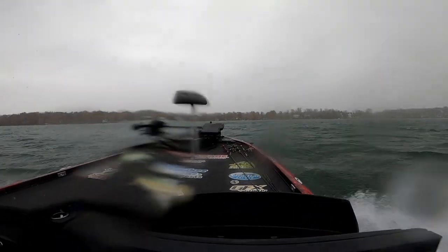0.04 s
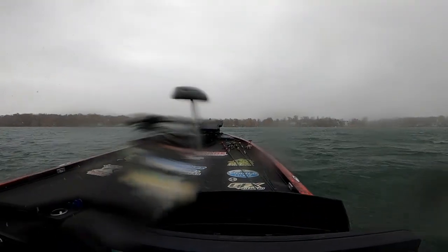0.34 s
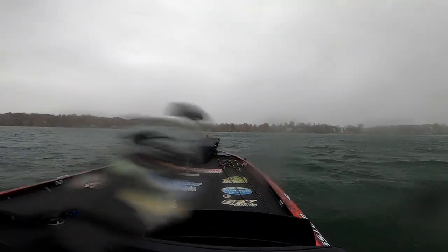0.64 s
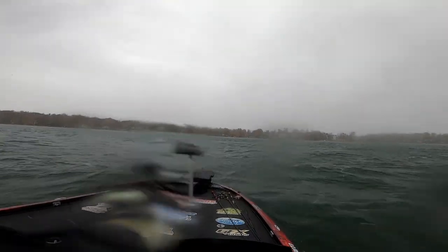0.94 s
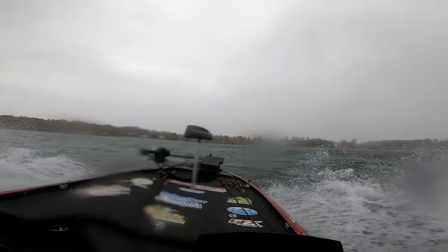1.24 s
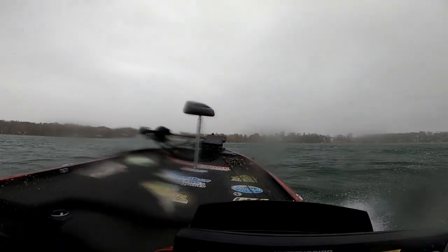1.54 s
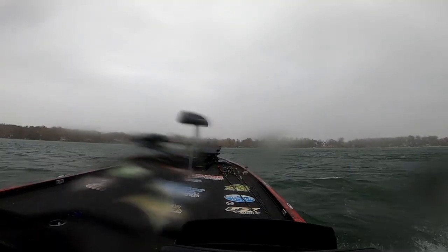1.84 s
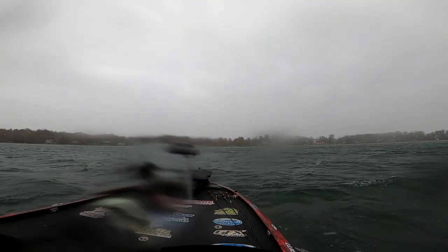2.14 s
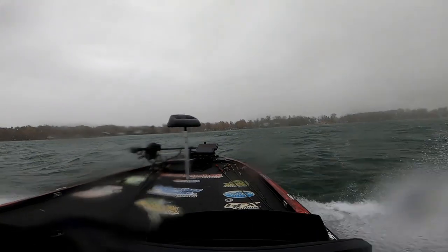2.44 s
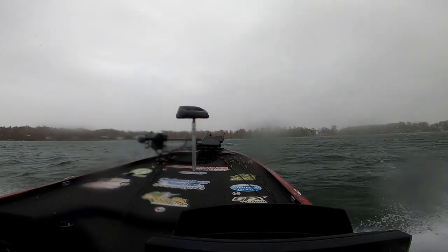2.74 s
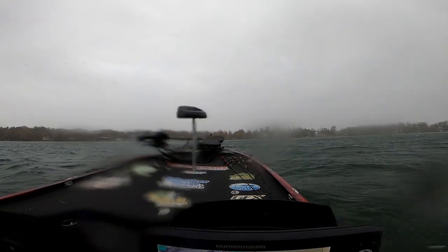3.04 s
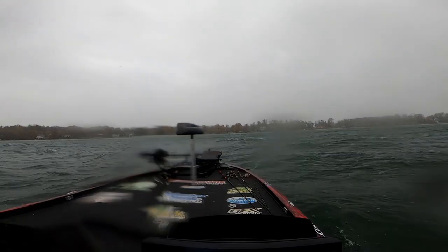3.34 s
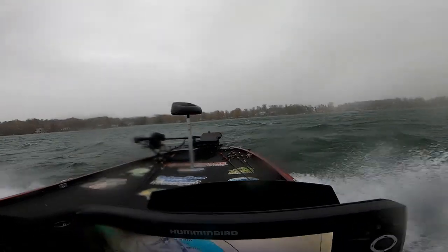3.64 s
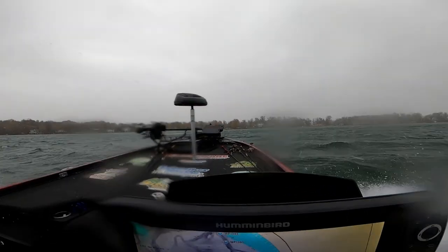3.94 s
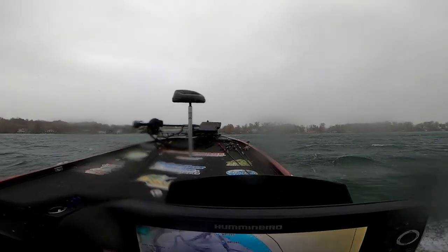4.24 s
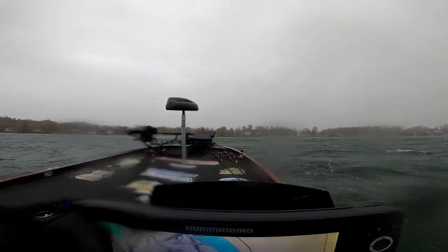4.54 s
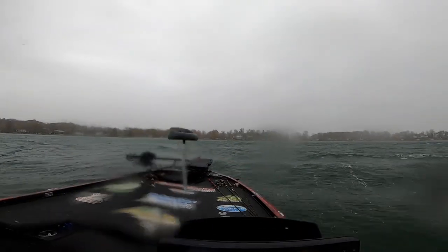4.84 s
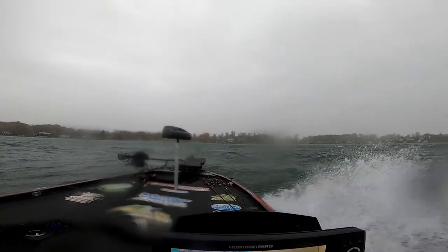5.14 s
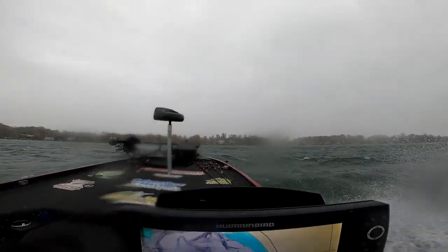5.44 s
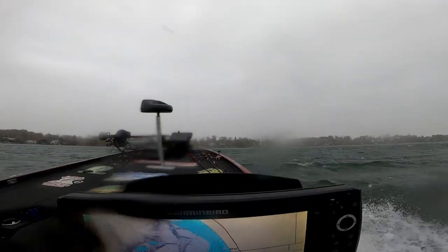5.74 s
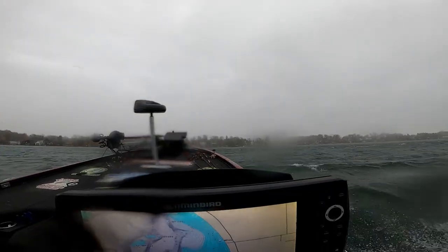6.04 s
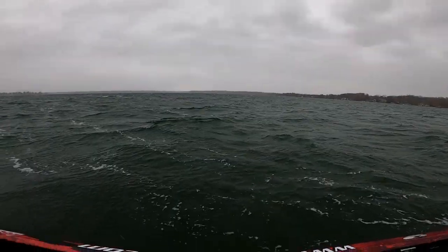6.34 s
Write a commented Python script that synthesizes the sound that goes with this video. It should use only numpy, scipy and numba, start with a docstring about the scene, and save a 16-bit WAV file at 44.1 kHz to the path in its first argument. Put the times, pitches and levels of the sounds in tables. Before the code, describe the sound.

Gusty wind buffets the microphone as a motorboat slaps and thumps through choppy waves, with rushing spray over a droning outboard engine.

```python
"""A gust buffets the microphone and water crackles on the hull: an outboard boat in chop on a windy lake.
From a stereo microphone at the console, each wave brings a gust, a wash and sheets of spray, a little
to the right. Water slaps the hull and keeps it droning; air trapped beneath it gulps and thumps.
The engine's tones sink as it eases off. A limiter holds the peaks; near the end the sound cuts off."""
import sys
import numpy as np
from scipy import signal
from scipy.fft import rfft, irfft
from scipy.io import wavfile
from scipy.ndimage import uniform_filter1d, minimum_filter1d
from numba import njit

SR = 44100
rng = np.random.default_rng(int(sys.argv[2]) if len(sys.argv) > 2 else 0)


def generate_wav(sig):
    """Save sig (samples, or channels by samples) to the path in sys.argv[1] as 16-bit PCM at SR."""
    pcm = np.round(np.clip(np.atleast_2d(sig).T, -1, 1) * 32767).astype(np.int16)
    wavfile.write(sys.argv[1], SR, pcm)


N = 281358
T = np.arange(N) / SR
CUT_S = 6.254

# spectra of wind on the microphone, wash, thrown sheets, mist and slaps: f/Hz, relative level/dB
WIND_SPECTRUM = [(10, -7.5), (22, -4.5), (42, -2), (70, -0.5), (110, -4), (160, -5.5), (230, -9.5),
                 (400, -15.5), (1000, -36), (3000, -99.5)]
WASH_SPECTRUM = [(100, -20.5), (190, -24.5), (280, 7.5), (370, 5.5), (460, 0.5), (680, -1), (1000, -5.5),
                 (1500, -14), (3000, -33.5), (7000, -79.5)]
SHEET_SPECTRUM = [(150, -45.5), (400, -12.5), (900, 3.5), (1400, 2.5), (1950, 1), (2350, 0), (2700, -2),
                  (2950, -5), (4200, -7.5), (6500, -16), (9000, -68)]
MIST_SPECTRUM = [(200, -40), (800, -2.5), (2000, -5.5), (3000, 1), (4000, 2), (5000, -2.5), (6200, -4.5),
                 (7000, -8), (8000, -17.5), (9500, -30), (11000, -49)]
SLAP_SPECTRUM = [(60, -7.5), (200, 4), (600, 23), (1200, 11), (2400, 2.5), (4000, -2), (6000, -13),
                 (9000, -49)]
# hull resonances: f/Hz, width/Hz, relative level/dB
HULL_MODES = [(192, 66, -1), (278, 89.5, 0), (319.6, 57, -2.5), (491, 27, -14), (678, 50, -18)]
# the hull's drone underfoot: t/s, level/dB
DRONE_LEVEL = [(0, -26), (.45, -32), (.85, -24), (1.25, -25.5), (1.74, -28.5), (2.0, -27), (2.45, -23),
               (2.8, -19), (3.12, -25.5), (3.7, -23.5), (4.0, -21), (4.3, -19.5), (4.6, -20.5),
               (4.72, -29.5), (5.0, -26.5), (5.1, -20.5), (5.45, -21.5), (6.24, -24.5)]
# the outboard, heard from the console: t/s, firing rate/Hz, level before trim/dB
ENGINE_RUN = [(0, 380, -36), (.35, 376.6, -37), (.5, 361.5, -23.5), (.7, 350.2, -27), (.92, 365.6, -27),
              (1.13, 369.6, -25), (1.2, 352.5, -33.5), (1.8, 280, -39.5), (2.3, 249, -41.5),
              (3.33, 235, -37), (3.4, 232, -21.5), (3.49, 232, -27), (3.55, 233, -21.5), (3.63, 238, -35),
              (3.74, 242.5, -23), (3.99, 256.7, -20.5), (4.13, 253.5, -31), (4.58, 233.8, -44),
              (4.67, 228.5, -18.5), (4.88, 227, -18.5), (5.09, 223.6, -18.5), (5.24, 241, -36),
              (5.38, 262.8, -22.5), (5.55, 261, -23), (5.8, 244.8, -31.5), (6.24, 223, -40.5)]
# engine tones: multiple of the crank rate, relative level/dB
# 6 is the firing; multiples of 1.714 are overtones of the propeller blades
ENGINE_ORDERS = [(1, -12), (3, -16), (4.29, -11.5), (5, -18), (5.14, -18), (6, 0), (7, -27), (8, -21),
                 (8.57, -21), (10.29, -21), (12, -25)]
# the bow ploughs into a wave: t/s, length/s, then levels before trim: gust/dB, wash/dB, sheets/dB
BOW_WAVES = [(0, 0.17, -12.5, -24.5, -36), (0.088, 0.27, -22.5, -28, -37.5),
             (0.857, 0.37, -22.5, -29.5, -53.5), (1.171, 0.28, -17, -26, -36), (1.453, 0.2, -19, -29, -56),
             (1.824, 0.12, -24, -40, -54), (2.165, 0.23, -27, -35.5, -34),
             (2.41, 0.16, -28.5, -34.5, -32.5), (2.615, 0.17, -22, -44, -33.5),
             (2.86, 0.23, -22, -34.5, -37), (3.584, 0.17, -23, -24.5, -38.5), (3.8, 0.063, -33, -26.5, -31),
             (4.06, 0.16, -17.5, -36.5, -36.5), (4.305, 0.14, -20, -40, -42.5),
             (4.99, 0.088, -28, -29.5, -37), (5.177, 0.12, -17, -32.5, -35), (5.6, 0.12, -19, -30, -52),
             (5.849, 0.25, -18, -27.5, -60)]
# brief dips in the rush of wind and water: t/s, depth/dB, length/s
RUSH_DIPS = [(0.147, 4, 0.032), (0.315, 5, 0.033), (1.446, 7.5, 0.028), (1.682, 1, 0.13), (2.231, 2, 0.052),
             (2.55, 1.5, 0.035), (4.385, 7, 0.016), (4.652, 0, 0.36), (5.07, 5, 0.032)]
# hiss of mist: t/s, level before trim/dB
MIST_LEVEL = [(0, -39), (.32, -65), (.5, -45.5), (1.1, -49.5), (1.35, -54), (1.5, -58.5), (1.85, -48.5),
              (2.15, -40), (2.7, -43), (2.92, -45), (3.3, -39.5), (3.65, -39), (3.98, -46.5), (4.55, -38.5),
              (4.66, -41.5), (4.97, -42), (5.17, -40), (5.47, -45), (5.85, -41.5), (6.24, -39.5)]
# droplets on the microphone housing: t/s, level before filtering/dB
DROPLET_HITS = [(1.187, -16), (4.384, -13)]
# slabs of thrown water landing close by: t/s, length/s, centre f/Hz, width/Hz, level/dB
SLAB_LANDINGS = [(1.276, 0.022, 2270, 450, -32.5), (1.318, 0.043, 2000, 1200, -35),
                 (2.2, 0.38, 2380, 520, -41), (2.25, 0.22, 1140, 800, -36.5),
                 (2.543, 0.01, 1900, 1200, -23.5), (2.58, 0.3, 2400, 520, -41),
                 (3.776, 0.071, 2120, 1100, -34.5), (4.06, .11, 2410, 600, -38.5),
                 (5.211, 0.066, 1750, 1097, -31.5), (5.26, 0.095, 746, 200, -30),
                 (5.613, 0.032, 1700, 1100, -32)]
# air pockets trapped under the hull: t/s, f/Hz, level before the envelope/dB, decay/s
AIR_POCKETS = [(0.099, 110, -14, 0.036), (.265, 108.4, -5, 0.036), (1.229, 201, -5.5, 0.038),
               (1.35, 99, -11.5, 0.042), (2.09, 252, -14, .035), (2.16, 224.6, -9.5, 0.031),
               (2.21, 91, -5.5, 0.021), (2.461, 132.5, -4, 0.032), (2.47, 187, -6.5, 0.029),
               (2.625, 246, -12, 0.03), (2.715, 55, -14, .035), (2.72, 210, -14, 0.032),
               (2.79, 160, -9.5, 0.029), (2.921, 115, -11.5, 0.039), (3.366, 235, -16, 0.057),
               (3.53, 272.7, -10.5, 0.047), (3.66, 204, -11, 0.048), (3.664, 160, -6, 0.022),
               (3.73, 70.5, -7.5, 0.029), (3.92, 165, -6.5, 0.039), (3.986, 224.7, -7, 0.069),
               (4.1, 287, -13, .05), (5.409, 152.3, -9, 0.083), (5.879, 127, -10.5, 0.051)]
# air cavities squeezed shut under the hull: t/s, length/s, first f/Hz, last f/Hz, level/dB
CAVITIES = [(1.426, .0105, 418, 1146, -15), (1.512, .016, 895, 576, -20)]
# waves striking the hull: t/s, level/dB, decay/s, upper band edge f/Hz
HULL_STRIKES = [(0.103, -21.5, .005, 1700), (0.111, -13, .002, 3840), (0.1267, -16, .0022, 4400),
                (0.1294, -18.5, .002, 5400), (0.1367, -16, .002, 4000), (.157, -22, .003, 2400),
                (.185, -22.5, .002, 3800), (.193, -22, .002, 2800), (.199, -27, 0.0017, 3000),
                (0.204, -13.5, .003, 2700), (0.2063, -22, 0.0016, 4180), (.2195, -25, .002, 1900),
                (.241, -22, .002, 4200), (.259, -23, .002, 1800), (.278, -20.5, .0018, 3800),
                (0.2911, -19, .0025, 3200), (.2955, -21, .002, 4150), (.3155, -19.5, .002, 3000),
                (.348, -24, .005, 2000), (1.207, -26, .015, 1300), (1.398, -24, .003, 1200),
                (1.415, -24, .003, 3200), (1.4323, -18, .0014, 4200), (1.437, -17, .0014, 2300),
                (1.475, -17, .0016, 2600), (1.493, -27, .002, 2320), (1.508, -21, .006, 2200),
                (1.562, -26, .004, 1300), (1.659, -19, .002, 1500), (1.682, -21, .0055, 1400),
                (2.215, -24.5, .013, 497), (2.472, -21.5, .016, 600), (2.544, -25, .005, 1500),
                (4.185, -28.5, .012, 890), (5.148, -21, .005, 900), (5.36, -22.5, .017, 1190),
                (5.423, -23, .003, 900), (5.76, -21, .005, 889), (5.909, -24, .014, 1400),
                (5.988, -23, .005, 1700)]


def undb(db):
    """Decibels to gain."""
    return 10 ** (np.asarray(db) / 20)


def unit(x):
    """Scale to rms 1."""
    return x / np.sqrt(np.mean(x ** 2))


def controls(table):
    """The columns of a curve table, one value a sample."""
    times, *columns = np.transpose(table)
    return [np.interp(T, times, column) for column in columns]


def butter(order, hz, kind="low"):
    """Butterworth filter sections."""
    return signal.butter(order, hz, kind, fs=SR, output="sos")


def walk(rate):
    """Smooth chance with spread 1 that changes about rate times a second."""
    f = np.arange(N // 2 + 1) * SR / N
    return unit(irfft(rfft(rng.standard_normal(N)) / (1 + (f / rate) ** 4), N))


def colour(x, points):
    """Shape x by a spectrum of (f/Hz, level/dB) points, at rms 1."""
    hz, db = np.transpose(points)
    f = np.maximum(np.arange(N // 2 + 1) * SR / N, 1)
    return unit(irfft(rfft(x) * undb(np.interp(np.log(f), np.log(hz), db)), N))


def even(x, steady):
    """Smooth the slow swells of a noise by the share steady, at rms 1."""
    return unit(x / uniform_filter1d(x ** 2, size=4000) ** (steady / 2))


def drops(rate, spread_db):
    """A shower of tiny impacts, a few much larger than the rest."""
    sizes = undb(spread_db * np.minimum(rng.exponential(size=N), 5))
    return unit(rng.standard_normal(N) * sizes * (rng.random(N) < rate / SR))


def place(x, right_db):
    """Lean a sound to the right of the microphone."""
    return x * undb(np.array([[-right_db], [right_db]]) / 2)


def widen(side, db):
    """The side signal of a stereo pair: added on the left, taken away on the right."""
    return undb(db) * side * np.array([[1], [-1]])


def wind(wind_db, side_top_hz=90):
    """Eddies press on both microphone ports almost alike, one following close on another."""
    mid, side = (even(colour(rng.standard_normal(N), WIND_SPECTRUM), steady=0.74) for _ in range(2))
    side = signal.sosfilt(butter(2, side_top_hz), side)
    return (mid + widen(side, db=-44)) * undb(wind_db)


def hull_drone(drone_db, band_hz=(140, 900)):
    """Water pounding under the boat keeps the shell ringing at its resonances."""
    pounding = signal.sosfilt(butter(2, band_hz, "band"), rng.standard_normal(N))
    ringing = sum((-1) ** k * undb(db) * signal.lfilter(*signal.iirpeak(hz, hz / width, fs=SR), pounding)
                  for k, (hz, width, db) in enumerate(HULL_MODES))
    return even(ringing, steady=0.29) * undb(drone_db)


def outboard(firing_hz, engine_db, trim_db=3, rough_db=1, flutter_db=2, blades_per_turn=1.714,
             deck_db=14, deck_hz=264, deck_width_hz=26, thrum_db=-30, thrum_rough_db=3):
    """Crank orders waver, more so at speed; the propeller thrums below."""
    crank_hz = firing_hz / 6
    crank_phase = 2 * np.pi * np.cumsum(crank_hz) / SR
    unrest = (firing_hz / firing_hz.max()) ** 3
    tones = 0
    for order, db in ENGINE_ORDERS:
        # weak orders swell as they cross the deck's resonance
        ring_db = (db < 0) * deck_db / (1 + ((order * crank_hz - deck_hz) / deck_width_hz) ** 2)
        waver = .45 * unrest * walk(22)
        tones += undb(db + ring_db + rough_db * walk(2.2)) * np.sin(order * crank_phase + waver)
    thrum_gain = undb(thrum_db + thrum_rough_db * walk(18))
    thrum = thrum_gain * np.sin(blades_per_turn * crank_phase + .5 * walk(15))
    return tones * undb(engine_db + trim_db + flutter_db * unrest * walk(56)) + thrum


def surges(wind_db=-21, wash_db=-31, sheet_db=-43, rise_s=0.04, fall_s=0.093):
    """Wind, wash and sheets in dB: each swells from its steady level while the bow is in a wave."""
    power = np.outer(undb([wind_db, wash_db, sheet_db]) ** 2, np.ones(N))
    for s, length, *levels_db in BOW_WAVES:
        rise = np.clip((T - s) / rise_s + .5, 0, 1)
        fall = np.exp(-np.maximum(T - s - length, 0) / fall_s)
        power += np.outer(undb(levels_db), rise * fall) ** 2
    return 10 * np.log10(power)


def lulls():
    """Gain that sinks for a moment and comes back."""
    return undb(-sum(depth * np.exp(-((T - s) / length * 2 - 1) ** 4) for s, depth, length in RUSH_DIPS))


def wash(wash_db, churn, trim_db=0.5, churn_db=0.03, side_low_hz=600):
    """Water tears along the hull on both sides of the console, a dense rush of tiny impacts."""
    mid, side = (colour(drops(9000, 1.7) * undb(churn_db * churn), WASH_SPECTRUM) for _ in range(2))
    # lows reach both ports alike; highs differ and lean to the right
    side = signal.sosfiltfilt(butter(2, side_low_hz, "high"), side / 2 - mid)
    return (mid + widen(side, db=-24)) * undb(wash_db + trim_db)


def sizzle(centre_hz=2380, width_hz=750, drift=.035, rasp_db=2):
    """The sizzle of thrown water: a band of noise that rasps and wanders in pitch."""
    phase = 2 * np.pi * np.cumsum(centre_hz * (1 + drift * walk(6))) / SR
    band = walk(width_hz / 2) * np.cos(phase) + walk(width_hz / 2) * np.sin(phase)
    return unit(band * undb(rasp_db * walk(70)))


def spray(sheet_db, mist_db, churn, sheet_trim_db=-1.58, mist_trim_db=1.5, churn_db=0.73, sizzle_db=-11):
    """Sheets of water break off the bow, a little to the right, and patter down under a hiss of mist."""
    scattered_db = mist_db + 1  # heavier drops fall wherever mist hangs
    sheet_gain = np.hypot(undb(sheet_db), undb(scattered_db)) * undb(sheet_trim_db + churn_db * churn)
    mist_gain = undb(mist_db + mist_trim_db)
    mid, side = (sheet_gain * colour(drops(7000, 0.89), SHEET_SPECTRUM)
                 + mist_gain * colour(drops(16000, 2.2), MIST_SPECTRUM) for _ in range(2))
    mid += undb(sizzle_db) * sheet_gain * sizzle()
    return place(mid, right_db=1) + widen(side, db=-21)


def ticks(decay_s=0.00022, band_hz=(2500, 6000)):
    """Single droplets land on the microphone housing."""
    bursts = sum(undb(db) * np.exp(-np.abs(T - s) / decay_s) * (T >= s) for s, db in DROPLET_HITS)
    return signal.sosfilt(butter(3, band_hz, "band"), bursts * rng.standard_normal(N))


def splashes(swell_share=0.46, skirt_gain=0.15, top_hz=5000):
    """Close to the microphone, each slab of water breaks into a dense crunch of drops around one pitch."""
    out = np.zeros(N)
    patter = signal.sosfilt(butter(6, top_hz), drops(6700, 1.5))
    for s, length, hz, width, db in SLAB_LANDINGS:
        t = T[:int(2 * length * SR)]
        span = slice(int(s * SR), int(s * SR) + len(t))
        core = signal.sosfilt(butter(2, [hz - width / 2, hz + width / 2], "band"), patter[span])
        skirt = signal.sosfilt(butter(2, [hz / 2, hz * 2], "band"), patter[span])
        shape = np.minimum(t / (swell_share * length), 1) * np.exp(-(t / length) ** 6)
        out[span] += undb(db) * shape * unit(core + skirt_gain * skirt)
    return out


def thumps(rise_s=0.017, rough_db=1.5):
    """Underfoot, air squeezed between hull and wave throbs for a few cycles."""
    out = 0
    for s, hz, db, decay in AIR_POCKETS:
        t = np.maximum(T - s, 0)
        shape = (1 - np.exp(-t / rise_s)) * np.exp(-t / decay)
        out += undb(db) * shape * np.sin(2 * np.pi * hz * t)
    return out * undb(rough_db * walk(40))


def gulps():
    """A cavity under the hull rings for a few cycles, its pitch gliding as its size changes."""
    out = 0
    for s, length, first_hz, last_hz, db in CAVITIES:
        age = np.clip((T - s) / length, 0, 1)
        phase = 2 * np.pi * np.cumsum(first_hz + (last_hz - first_hz) * age) / SR
        out += undb(db) * np.sqrt(4 * age * (1 - age)) * np.sin(phase)
    return out


def slaps(rise_share=0.19, low_edge_share=0.17, crack_gain=0.063):
    """Waves crack on the hull; a flatter blow is brighter, a longer one swells more slowly."""
    out = np.zeros(N)
    water = colour(rng.standard_normal(N), SLAP_SPECTRUM)
    t = T[:SR // 6]
    for s, db, decay, bright_hz in HULL_STRIKES:
        span = slice(int(s * SR), int(s * SR) + len(t))
        band = butter(2, [low_edge_share * bright_hz, bright_hz], "band")
        body = unit(signal.sosfiltfilt(band, water[span]))
        shape = (1 - np.exp(-t / (rise_share * decay))) * np.exp(-t / decay)
        burst = unit((body + crack_gain * water[span]) * shape)
        out[span] += undb(db) * burst / unit(shape).max()  # the level holds at the envelope's crest
    return out


def scene():
    """Wind, engine and water as they reach the console, until the sound cuts off."""
    wind_db, wash_db, sheet_db = surges()
    (mist_db,), (drone_db,) = controls(MIST_LEVEL), controls(DRONE_LEVEL)
    churn = walk(90)  # quick spurts in the spray, faint in the wash
    rush = wind(wind_db) + hull_drone(drone_db) + wash(wash_db, churn) + spray(sheet_db, mist_db, churn)
    engine = outboard(*controls(ENGINE_RUN))
    impacts = place(slaps() + splashes(), right_db=0.87) + gulps() + thumps() + ticks()
    gate = np.clip(np.minimum(T, CUT_S - T) / .002, 0, 1)  # 2 ms edges
    return (rush * lulls() + engine + impacts) * gate


def record(dry, ceiling_db=-6.0, release_s=0.068, top_hz=11800):
    """Behind the microphone a quick limiter holds the peaks, and the top is cut."""
    peak = follow(np.abs(dry).max(axis=0), 1 / (release_s * SR))
    gain = np.minimum(1, undb(ceiling_db) / np.maximum(peak, 1e-9))
    gain = uniform_filter1d(minimum_filter1d(gain, size=65), size=65)  # eases down just ahead of a peak
    return signal.sosfilt(signal.ellip(8, .2, 70, top_hz, fs=SR, output="sos"), dry * gain)


@njit
def follow(x, release):
    """The limiter's peak follower: jumps up at once, sinks slowly."""
    out, held = np.empty(len(x)), 0.
    for i in range(len(x)):
        held = max(x[i], held * (1 - release))
        out[i] = held
    return out


dry = scene()
out = record(dry)
generate_wav(out)
```